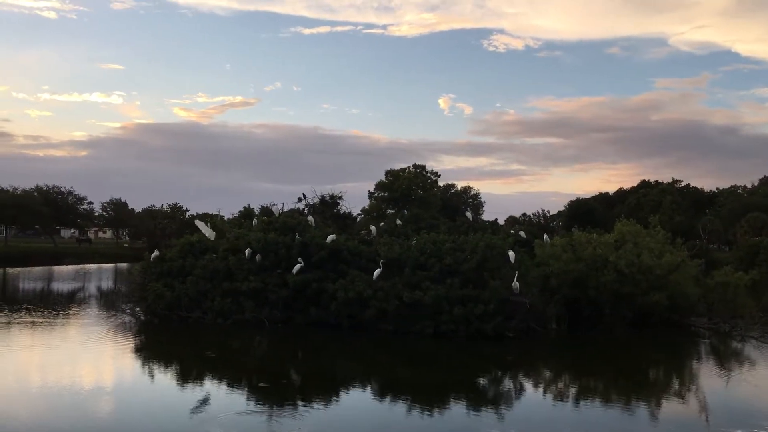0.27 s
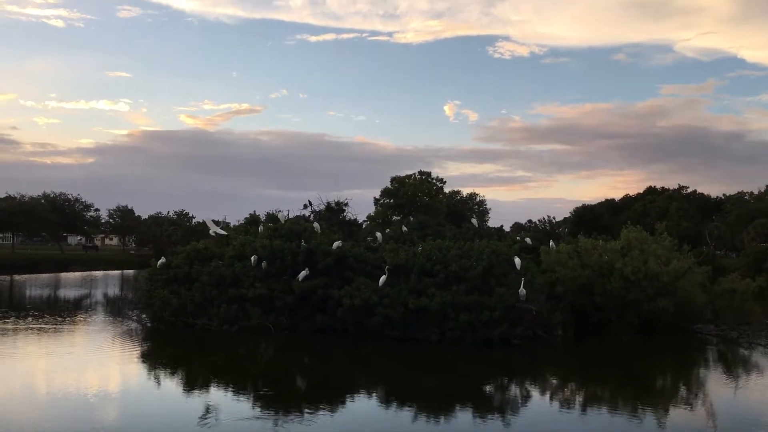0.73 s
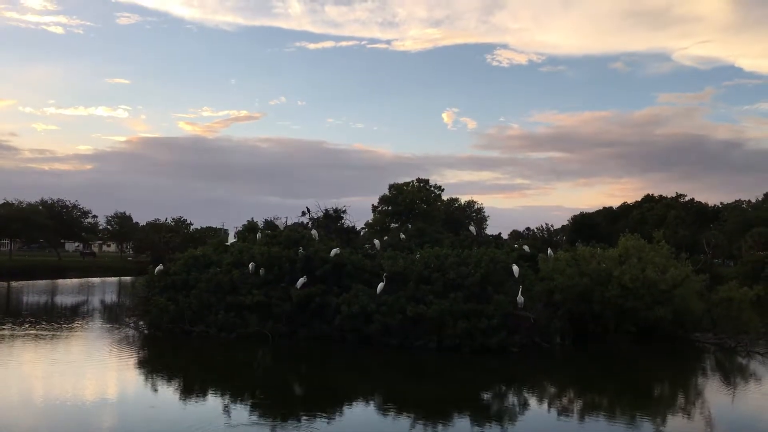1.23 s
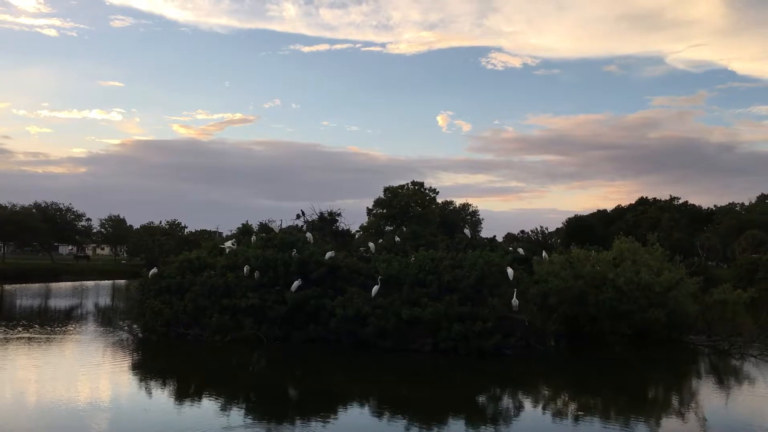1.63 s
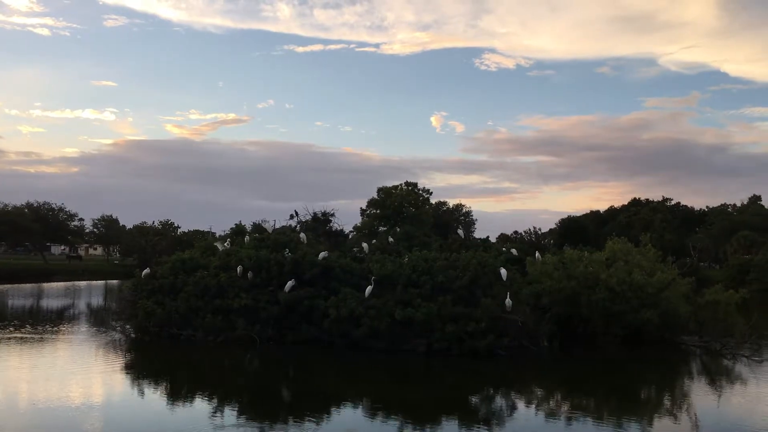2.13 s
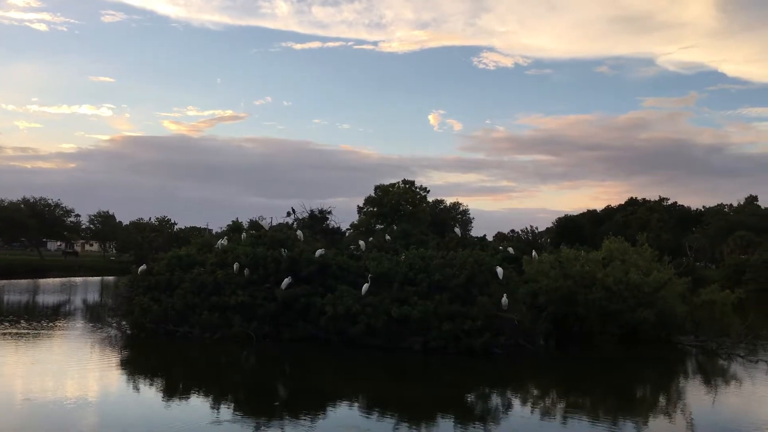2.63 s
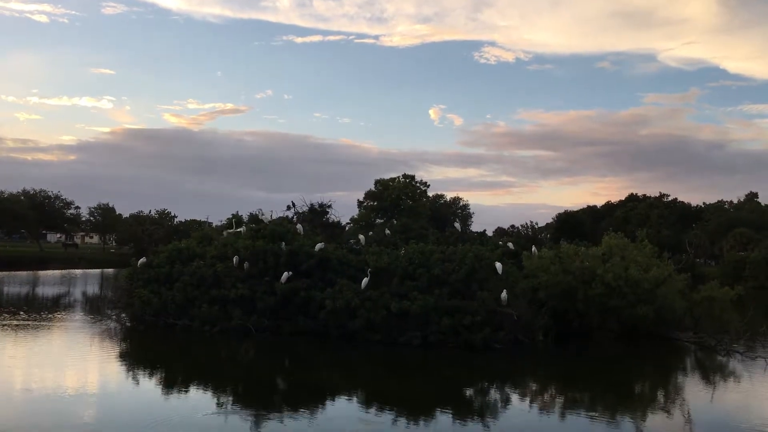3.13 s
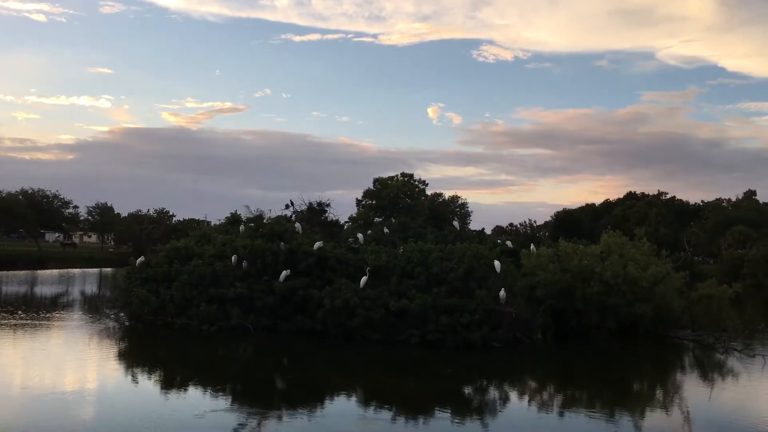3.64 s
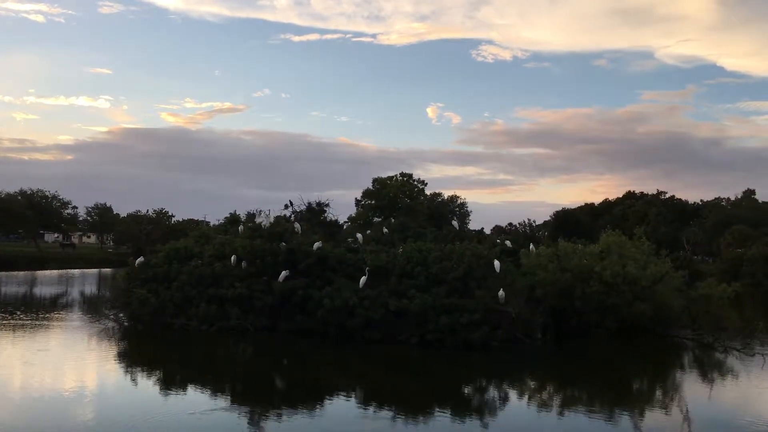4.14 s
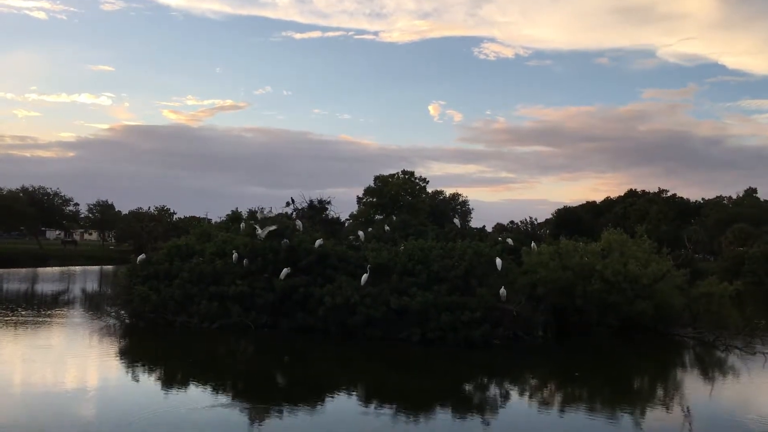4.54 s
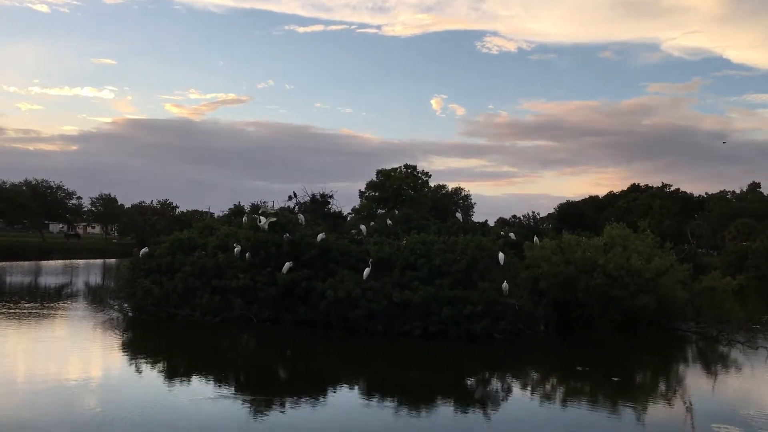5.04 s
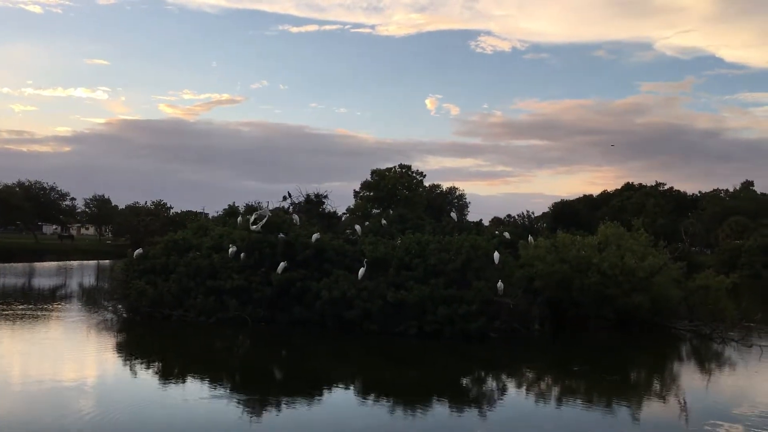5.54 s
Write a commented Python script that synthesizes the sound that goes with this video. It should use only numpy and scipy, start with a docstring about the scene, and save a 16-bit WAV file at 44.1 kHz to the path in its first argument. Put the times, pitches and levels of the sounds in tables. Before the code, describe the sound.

Outdoor bird roost heard across open water, with a quiet bed of low traffic rumble, faint hum, air noise and a blurred murmur of many far birds; a weak distant motor swells around 0.3 and 1.9 s, then fades. One heron-like bird croaks nearly four times a second throughout, short and nasal, hoarse at first, clearer and louder around 2.3 to 3.8 s, rougher again around 4.5 s. From 0 to 0.6 s thin piercing squeals swoop and overlap, with lingering echo; weaker ones continue to about 1.7 s, and a few faint ones return after 3.9 s. From 1.2 s dry toneless keks clatter between croaks, densest around 2.5 to 3.9 s. Short grating squawks occur throughout, a stronger one at 3.4 s. Faint high trills shimmer at 2.6 to 3.1 s, about 4 to 4.5 s and 5.5 s. A longer gliding squawk opens at 5.3 s, followed by a clear ringing croak near 5.6 s.

```python
"""On an island in a lake, egrets and herons gather at their roost at dusk, heard across the water.
Behind them lie distant traffic, a far motor, a hum, air noise and the blurred murmur of the far colony.
One bird croaks about four times a second: a harmonic voice that turns from ringing to hoarse.
Others answer with noise shaped by their throats (dry keks, grating squawks, far trills) and with
thin gliding whistles (squeals). A dull tail of noise makes the faint echo of the trees."""
import sys
import numpy as np
from scipy import signal
from scipy.fft import rfft, irfft, next_fast_len
from scipy.io import wavfile
from scipy.ndimage import map_coordinates

SR = 44100
rng = np.random.default_rng(int(sys.argv[2]) if len(sys.argv) > 2 else 0)


def pcm_store(signal):
    """Save signal as 16-bit PCM."""
    levels = np.round(np.clip(np.atleast_2d(signal), -1, 1) * 32767)
    wavfile.write(sys.argv[1], SR, levels.astype(np.int16).T)


N = 254898  # length of the scene in samples


def undb(db):
    """Turn decibels into a gain."""
    return 10 ** (np.asarray(db) / 20)


def level(x, db=0):
    """Scale a sound to an rms level in dB; 0 dB is an rms of 1."""
    return x * undb(db) / np.sqrt(np.mean(x ** 2) + 1e-20)


def clock(length_s):
    """Sample times in seconds, for at least 64 samples."""
    return np.arange(max(int(length_s * SR), 64)) / SR


def add(out, start_s, x):
    """Mix a sound in at its start time."""
    i = int(np.clip(start_s * SR, 0, N - 1))
    out[i:i + len(x)] += x[:N - i]


def noise(n):
    """White noise from a random stream of its own."""
    return np.random.default_rng(rng.integers(1 << 30)).standard_normal(n)


def wander(n, hz):
    """A smooth random curve through hz new random values a second."""
    place = np.arange(n) * hz / SR
    return map_coordinates(noise(int(place[-1]) + 4), [place + 1], order=3, mode="nearest")


def filtered(x, gain):
    """Weight a sound by a gain that depends on frequency."""
    size = next_fast_len(len(x) + 512)
    hz = np.maximum(np.fft.rfftfreq(size, 1 / SR), 1)
    return irfft(rfft(x, size) * gain(hz), size)[:len(x)]


def gain_at(hz, points):
    """Read a gain between the points of a spectrum, on a log-frequency axis."""
    f, db = np.transpose(points)
    return undb(np.interp(np.log(hz), np.log(f), db))


def colour(x, points, tilt_db=0):
    """Give a sound a spectrum, tilted in dB per octave, at an rms of 1."""
    def gain(f):
        return gain_at(f, points) * undb(tilt_db * np.log2(f / f[-1]))
    return level(filtered(x, gain))


def ring(x, hz, width):
    """Two equal resonances in a row, for steep sides, at an rms of 1."""
    return level(filtered(x, lambda f: (1 + 1j * (f / hz - hz / f) * hz / width) ** -2))


def swell(t, hold_s, attack, release):
    """Loudness shape of a call: it opens, holds and dies away."""
    opening = np.sin(np.pi / 2 * np.minimum(t / attack, 1)) ** 2
    return opening * np.exp(-np.maximum(t - hold_s, 0) / release)


def rattle(n, hz, depth_db):
    """Air let through in uneven puffs by a slack membrane, at an rms of 1."""
    phase = 2 * np.pi * np.cumsum(hz * (1 + 0.255 * wander(n, hz))) / SR
    puffs_db = depth_db * (np.cos(phase) + 0.32 * wander(n, hz))
    return level(noise(n) * undb(puffs_db))


# Relative spectrum of the traffic rumble: pitch_hz, level_db
TRAFFIC_SPECTRUM = [(20, -25), (30, -24), (42, -8), (60, 3), (85, -2.5), (125, -2.5), (170, -9.5),
                    (240, -12), (320, -14), (400, -20), (500, -23.5)]
# Loudness of a far motor, which swells twice and fades: time_s, level_db
MOTOR_LEVELS = [(0.0, -59), (0.26, -47.5), (0.77, -52), (1.0, -59), (1.94, -49), (2.22, -58.5), (2.3, -79)]
# Relative spectrum of the air noise, before its low end is cut: pitch_hz, level_db
AIR_SPECTRUM = [(15, -37), (25, -2), (75, 3), (126, -16), (188, -18), (297, -27.5), (469, -15), (648, -11),
                (1240, -11), (1660, -18), (2010, -17.5), (3630, -46), (5010, -35), (6050, -31.5),
                (15500, -46)]


def distance():
    """Low noise is traffic, an unsteady sine a motor, a narrow noise band a hum, broad noise the air."""
    t = np.arange(N) / SR
    rumble = filtered(colour(noise(N), TRAFFIC_SPECTRUM), lambda f: 1 / (1 + (f / 520) ** 6))
    rumble = level(rumble, -51)

    turns = np.cumsum(103.3 * (1 + 0.022 * wander(N, 12.9))) / SR  # motor near 103.3 Hz
    time_s, level_db = np.transpose(MOTOR_LEVELS)
    motor_db = np.interp(t, time_s, level_db)
    motor_db = motor_db - 12 * np.maximum(t - time_s[-1], 0)  # after the table: 12 dB less each second
    motor = level(np.sin(2 * np.pi * turns)) * undb(motor_db + 2 * wander(N, 7.4))

    hum = level(ring(noise(N), 299.2, width=16.4), -69.5)
    air = filtered(colour(noise(N), AIR_SPECTRUM), lambda f: 1 / (1 + (330 / f) ** 4))
    return rumble + motor + hum + level(air, -58.5)


def colony():
    """Many far birds blur into a murmur of noise bands, each swelling on its own."""
    # pitch_hz, width_hz, relative level_db
    bands = [(637, 120, -2), (1060, 540, 7.5), (1460, 550, -10),
             (2150, 950, 0), (3140, 860, 2.5), (4040, 760, 1.0)]
    murmur = np.zeros(N)
    for hz, width_hz, db in bands:
        murmur += ring(noise(N), hz, width_hz) * undb(db + 4.5 * wander(N, 11))
    return level(murmur, -58.5)


def neighbours(count=22):
    """Birds deeper in the bushes croak faintly at random; the longer croaks are lower."""
    out = np.zeros(N)
    for when, size, effort in rng.random((count, 3)):
        length_s, pitch_hz = 0.0615 + 0.0664 * size, 1150 - 550 * size
        call = croak(length_s, pitch_hz, -59 + 6 * effort, rough=0.32, mouth_hz=2010)
        add(out, when * N / SR, call)
    return out


# Levels in the call tables are those before the swell of each call and before lake().
# Far trills: start_s, length_s (it dies away from 0.9 of this), pitch_hz, level_db
TRILL_CALLS = [(2.556, 0.58, 3900, -57.5), (3.99, 0.11, 3970, -55), (4.284, 0.18, 3420, -58),
               (4.376, 0.083, 3870, -71), (5.539, .24, 4020, -61)]


def trill(length_s, hz, db):
    """A far bird repeats a narrow note, made of ringing noise, in about 25 pulses a second."""
    t = clock(length_s)
    beats = np.cumsum(25 * (1 + 0.22 * wander(len(t), 15.0))) / SR
    pulses = np.sin(np.pi * beats) ** 2
    note = ring(noise(len(t)), hz, width=390)
    return level(note * pulses, db) * swell(t, length_s * 0.9, attack=0.016, release=0.023)


# Dry keks: start_s, length_s (they die away from 0.72 of this), level_db, brightness in dB per octave
KEK_CALLS = [ (1.186, .035, -43, -1), (1.672, .035, -46.5, 1.5), (1.802, 0.05, -45, -2),
             (1.991, 0.062, -43, -3), (2.549, 0.048, -48, 0), (2.722, .02, -46, -9),
             (2.792, 0.061, -43.5, -2), (3.041, 0.021, -46, 2.5), (3.213, 0.037, -42.5, -9),
             (3.367, 0.03, -45, -4), (3.409, 0.018, -44.5, 5.5), (3.444, 0.014, -51, 8),
             (3.529, 0.053, -48.5, -1.5), (3.688, 0.013, -45, 5), (3.73, 0.19, -52.5, 8.5),
             (4.062, .023, -49, 3), (4.289, 0.064, -48.5, 1), (4.531, 0.029, -46, 3.5),
             (4.759, 0.027, -44.5, 2.5), (4.991, .029, -47, 3.5), (5.228, 0.024, -47.5, 1.5),
             (5.656, .017, -45, 1.5)]
# Relative spectrum of a kek before its brightness tilt: pitch_hz, level_db
KEK_SPECTRUM = [(500, -69), (1100, -1.5), (1900, 0), (3000, 3.5), (4200, -1.5), (5000, -9), (6200, -6),
                (7500, -20.5), (10000, -25), (15000, -40)]


def kek(length_s, db, bright_db):
    """A toneless rattle through a long windpipe; its even resonance spacing varies from call to call."""
    t = clock(length_s + 0.11)
    spacing_hz = 760 * np.exp(0.11 * noise(1)[0])

    def windpipe(f):
        blur = 1 + (f / 5500) ** 4  # the resonances blur towards the treble
        return undb(3.0 * np.cos(2 * np.pi * f / spacing_hz) / blur)

    throat = filtered(rattle(len(t), hz=144, depth_db=0.5), windpipe)
    flutter = undb(1.3 * wander(len(t), 62))
    call = level(colour(throat, KEK_SPECTRUM, bright_db) * flutter, db)
    return call * swell(t, length_s * 0.72, attack=0.0034, release=0.015)


# Upper throat resonances: multiple of the lowest, width_hz before widening by 1.24, relative level_db
UPPER_RESONANCES = [(1.4, 236, 20), (1.85, 337, 20), (2.2, 370, 10), (3.6, 920, 13)]


def grate(n, hz):
    """Grating puffs ring a long throat: its lowest resonance and the upper ones, each at an rms of 1."""
    puffs = rattle(n, hz=75.4, depth_db=-1)
    upper = np.zeros(n)
    for ratio, width_hz, db in UPPER_RESONANCES:
        upper += undb(db) * ring(puffs, hz * ratio, width_hz * 1.24)
    return ring(puffs, hz, width=170), level(upper)


# Grating squawks: start_s, length_s (they die away from 0.62 of this), throat resonance pitch_hz,
# level_db, upper resonances in dB relative to the lowest
SQUAWK_CALLS = [ (0.84, 0.081, 980, -48.5, -2), (1.225, 0.21, 1050, -50, -3), (1.76, 0.13, 2290, -49, -13),
                (2.419, 0.099, 1140, -48, -5.5), (2.914, .05, 2160, -52, -30),
                (3.369, 0.13, 990, -41.5, -3), (3.556, 0.13, 1084, -47, -3), (4.108, .06, 2480, -45, -11),
                (4.831, 0.044, 1320, -48, 1), (5.47, 0.019, 2526, -42.5, -15), (5.75, .04, 1080, -45, -21)]


def squawk(length_s, hz, db, upper_db):
    """A short grating call; the wider the bill, the stronger the upper resonances."""
    t = clock(length_s + 0.43)
    low, upper = grate(len(t), hz)
    call = level(low + undb(upper_db) * upper, db)
    return call * swell(t, length_s * 0.62, attack=0.021, release=0.026)


# One long squawk over time: time_s, throat resonance pitch_hz, lowest resonance level_db,
# upper resonances level_db, hiss level_db
LONG_SQUAWK_PATH = [(5.27, 1080, -69, -70, -77), (5.292, 1110, -47, -68, -83), (5.312, 1101, -36, -65, -58),
                    (5.328, 1150, -45.5, -62, -53.5), (5.386, 1130, -45.5, -43.5, -54.5),
                    (5.49, 1073, -45, -48.5, -55), (5.54, 1006, -58, -82, -87), (5.56, 1004, -60, -70, -65)]


def long_squawk():
    """A drawn-out squawk: the throat glides; upper resonances and hiss come in as the bill opens."""
    time_s, *controls = np.transpose(LONG_SQUAWK_PATH)
    t = clock(time_s[-1] - time_s[0])
    hz, low_db, upper_db, hiss_db = (np.interp(t + time_s[0], time_s, c) for c in controls)
    # uneven playback speed moves all resonances together
    place = np.cumsum(hz / hz.mean())
    steady = grate(len(t), hz.mean())
    low, upper = (map_coordinates(x, [place], order=3, mode="mirror") for x in steady)
    hiss = colour(rattle(len(t), hz=147.7, depth_db=4.5), KEK_SPECTRUM, tilt_db=5)
    call = low * undb(low_db) + upper * undb(upper_db) + hiss * undb(hiss_db)
    out = np.zeros(N)
    add(out, time_s[0], call * swell(t, t[-1] - 0.02, attack=0.01, release=0.01))
    return out


# Squeals: start_s, rise_s, hold_s, fall_s, top pitch_hz, depth of the pitch arch in octaves,
# level_db before the throat
SQUEAL_CALLS = [ (0, 0, 0.079, 0.038, 3157, 0.18, -38.5), (0, 0, 0.008, 0.021, 4770, .4, -44),
                (0.061, 0.059, 0.0097, 0.019, 4930, 0.57, -43), (.155, 0.041, 0, 0.12, 3287, .58, -44),
                (.163, 0.054, 0.011, 0.02, 4700, 0.38, -42), (.165, .043, 0, 0, 8230, .25, -48),
                (.158, 0.057, 0, 0.016, 6850, .3, -48), (0.177, .072, 0, 0.025, 5530, 0.93, -44.5),
                (0.234, 0.058, 0.032, 0.045, 6030, 0.27, -38), (0.322, 0.027, 0, 0.058, 3170, 0.62, -48.5),
                (0.327, .022, 0.0077, 0.062, 4240, 0.214, -53),
                (.383, 0.077, 0.0024, 0.005, 5380, 0.75, -41), (0.437, 0.01, .02, .08, 5500, 0.12, -43),
                (0.434, 0.048, 0.067, .06, 2780, 0.32, -55), (0.439, .03, 0, 0.059, 4420, .25, -47.5),
                (0.569, .028, 0, 0.02, 3810, 0.32, -51.5), (0.771, 0.11, 0.0076, 0.035, 6100, 0.39, -55),
                (0.878, .12, 0, 0, 4410, .3, -58), (0.973, .11, 0.042, 0.025, 2618, 0.53, -50),
                (1.227, .01, .06, 0.094, 2833, 0.28, -54.5), (1.405, 0.063, 0.11, .04, 2990, 0.45, -52.5),
                (1.401, 0.072, 0, 0.0081, 2536, 0.62, -45), (1.662, 0.051, 0.024, 0.037, 2860, 0.46, -55),
                (3.915, 0.037, 0.0026, 0.028, 1830, 0.25, -54.5),
                (4.33, 0.11, 0.041, 0.038, 3900, 0.11, -61.5), (4.574, .09, 0.02, 0.0082, 2170, 0.31, -64),
                (4.879, .055, .01, 0.0066, 2260, .3, -62)]
# Gain of the squealing throat: pitch_hz, gain_db
THROAT_GAIN = [(1500, 9), (2100, -18), (2700, 2.5), (4500, 1.5), (5400, -8.5), (6300, -10.5), (7800, -9.5),
               (9400, -3.5), (10300, -11), (15000, -24)]
# Relative spectrum of the screech noise: pitch_hz, level_db
SCREECH_SPECTRUM = [(1500, -8), (2600, -11.5), (4500, 2), (5400, -4.5), (6500, -7), (8000, -8), (9500, -11),
                    (10500, -23.5), (15000, -26)]


def squeal(rise, hold, fall, top_hz, depth, top_db):
    """A thin whistle swoops up, holds and drops through throat resonances; forced hard, it screeches."""
    t = clock(rise + hold + fall)
    n = len(t)
    before_top = (rise - t) / max(rise, 1 / SR)
    after_top = (t - rise - hold) / max(fall, 1 / SR)
    # 0 at the top, 1 at the feet; the power rounds the arch
    slack = np.maximum(np.maximum(before_top, after_top), 0) ** 1.7
    glide = top_hz * 2 ** (-depth * slack)
    hz = glide * (1 + 0.0093 * wander(n, 529))
    phase = 2 * np.pi * np.cumsum(hz) / SR

    k = np.arange(1, 4)[:, None]  # harmonic numbers
    slope_db = np.interp(hz, [3200, 3900], [-5.5, -17])  # the top register is nearly pure
    weights = gain_at(k * hz, THROAT_GAIN) * undb(slope_db * np.log2(k)) * (k * hz < SR / 2)
    power = (weights ** 2).sum(0)
    tone = (weights * np.sin(k * phase)).sum(0) / np.sqrt(power / 2)

    tire_db = 37 * np.maximum(t - rise, 0)  # weakens by 37 dB a second once it has reached its top
    db = top_db - 5.5 * slack - tire_db + 10 * np.log10(power)  # the feet are 5.5 dB weaker
    # in fast glides the other side of the syrinx (voice organ) sounds too and throws sidebands
    second = np.minimum(abs(np.gradient(glide)) * SR / 22000, 1)
    tone = tone * (1 + 0.6 * second * np.sin(0.19 * phase + 1.2 * wander(n, 100)))
    screech_db = np.interp(db, [-56, -48], [-13, -9.5])
    screech = colour(noise(n), SCREECH_SPECTRUM) * undb(screech_db)
    ends = np.clip(np.minimum(t, t[-1] - t) / 0.001, 0, 1)  # 1 ms fades
    flutter = undb(2 * wander(n, 183))
    return (tone * flutter + screech) * ends * undb(db)


# Croaks: start_s, length_s (they die away from 1.024 of this), top pitch_hz, level_db at the height,
# roughness (0 ringing, 1 hoarse; limited to 0.02-0.98), mouth resonance pitch_hz
CROAK_CALLS = [ (0.05, 0.09, 704, -39, 1.16, 1420), (0.252, .105, 660, -41, 1, 2300),
               (0.463, .12, 680.5, -39.5, 0.9, 1570), (0.691, 0.15, 651.6, -41.5, 0.89, 1900),
               (0.933, 0.11, 658, -41.5, 0.83, 2000), (1.129, 0.096, 633, -38, 0.68, 1240),
               (1.393, 0.091, 680, -41.5, 0.58, 2000), (1.578, .085, 720, -37, 0.46, 1370),
               (1.69, 0.079, 674, -44, 0.52, 1500), (1.858, 0.087, 702, -39.5, 0.78, 1410),
               (2.122, .095, 676, -39, 0.84, 2000), (2.304, 0.094, 730, -34.5, 0.28, 1520),
               (2.58, 0.089, 715.4, -38.5, 0.53, 1620), (2.755, 0.094, 730, -35.5, 0.44, 1470),
               (3.05, 0.09, 676, -41.5, 0.79, 1370), (3.232, 0.079, 741, -33.5, .32, 1730),
               (3.505, .082, 735, -39.5, 0.41, 1470), (3.705, 0.093, 727, -37, 0.38, 1880),
               (3.972, 0.11, 664, -43.5, 0.86, 2060), (4.17, 0.079, 709.6, -36, 0.57, 2080),
               (4.457, 0.097, 625, -41.5, 1.1, 1900), (4.65, 0.088, 675.5, -38, 0.86, 2030),
               (4.932, .13, 656, -43.5, 0.8, 2010), (5.111, 0.08, 716.5, -36, 0.52, 1380),
               (5.572, 0.089, 721.5, -37.5, .03, 1520)]
# Level of each harmonic from the first up, before brightness and mouth: level_db
RINGING_HARMONICS = [-9.5, 1, -8.5, -10, -16, -28, -61, -30]
HOARSE_HARMONICS = [-1.5, -3.5, 1.5, -13.5, -7, -7, -6, -21]
# Relative spectrum of the rasp before its brightness tilt: pitch_hz, level_db
RASP_SPECTRUM = [(300, -51), (520, -11.5), (700, 1), (900, -1), (1300, 5.5), (1900, -0.5), (3000, 1),
                 (4200, -17), (5000, -19.5), (6500, -22.5), (9000, -35.5), (15000, -47)]


def croak(length_s, pitch_hz, db, rough, mouth_hz):
    """A harmonic voice arches in pitch and brightens with effort; roughness shakes it and adds a rasp."""
    t = clock(length_s + 0.045)
    n, rough = len(t), np.clip(rough, 0.02, 0.98)
    # dB per octave: a clean croak, 0.93 for each dB above the usual -37.5, and up to 3.5 for hoarseness
    bright_db = -1.45 + 0.93 * max(db + 37.5, 0) + 3.5 * rough
    droop = np.minimum((t / length_s - 0.45) ** 2 * 4, 1.2)  # 0 at the height of the call
    jitter = (0.0051 + 0.018 * rough) * wander(n, 162)
    hz = pitch_hz * (1 - 0.115 * droop ** 0.697 + jitter)
    phase = 2 * np.pi * np.cumsum(hz) / SR

    voice = np.zeros(n)
    for k, (ringing_db, hoarse_db) in enumerate(zip(RINGING_HARMONICS, HOARSE_HARMONICS), 1):
        mouth_db = 6 / (1 + ((k * hz - mouth_hz) / 330) ** 2)
        line_db = ringing_db + rough * (hoarse_db - ringing_db)
        line_db = line_db + bright_db * np.log2(k) + mouth_db + 2 * wander(n, 50)
        # chaotic vibration shakes each harmonic in size and phase, the high ones most
        chaos = rough ** (3 / k)
        steady = np.sin(k * phase)
        shaken = wander(n, 167.8) * steady + wander(n, 163.4) * np.cos(k * phase)
        shaken = shaken / np.sqrt(2)
        voice += undb(line_db) * (np.sqrt(1 - chaos) * steady + np.sqrt(chaos) * shaken)

    # the rasp is strongest when the bill is widest
    puffs = rattle(n, hz=210, depth_db=5)
    rasp = colour(puffs, RASP_SPECTRUM, bright_db) * undb(-5 * droop)
    call = level(level(voice) + undb(2.5) * rough * rasp)
    return call * undb(db - 4.34 * droop) * swell(t, length_s * 1.024, attack=0.013, release=0.0022)


def lake(x, direct_db, echo_db, t60):
    """Direct calls plus a dull noise tail, scattered by leaves and trunks, that drops 60 dB in t60 s."""
    t = clock(1)
    tail = noise(len(t)) * undb(-60 * t / t60) * np.minimum(t / 0.0017, 1)
    tail = filtered(tail, lambda f: 1 / (1 + 1j * f / 6000))  # duller above 6 kHz
    tail = tail / np.sqrt(np.sum(tail ** 2))
    echo = signal.fftconvolve(x, tail)[:N]
    return x * undb(direct_db) + echo * undb(echo_db)


def scene():
    """Mix all the callers on the island, their echoes and the background."""
    calls, whistles = neighbours(), np.zeros(N)
    callers = ((trill, TRILL_CALLS), (kek, KEK_CALLS), (squawk, SQUAWK_CALLS), (croak, CROAK_CALLS))
    for voice, table in callers:
        for start_s, *shape in table:
            add(calls, start_s, voice(*shape))
    for start_s, *shape in SQUEAL_CALLS:
        add(whistles, start_s, squeal(*shape))
    birds = lake(calls, direct_db=-3.5, echo_db=-15, t60=0.19)
    birds = birds + lake(whistles, direct_db=-1.5, echo_db=-14, t60=0.97)
    birds = birds + lake(long_squawk(), direct_db=0.5, echo_db=-12, t60=0.28)
    return (distance() + colony() + birds)[None]


def record(dry):
    """Fade in over 3 ms and cut the treble steeply above 15750 Hz."""
    opening = np.minimum(np.arange(N) / (0.003 * SR), 1)
    treble_cut = signal.ellip(10, 0.2, 80, 15750, fs=SR, output="sos")
    return signal.sosfilt(treble_cut, dry * opening)


dry = scene()
out = record(dry)
pcm_store(out)
```